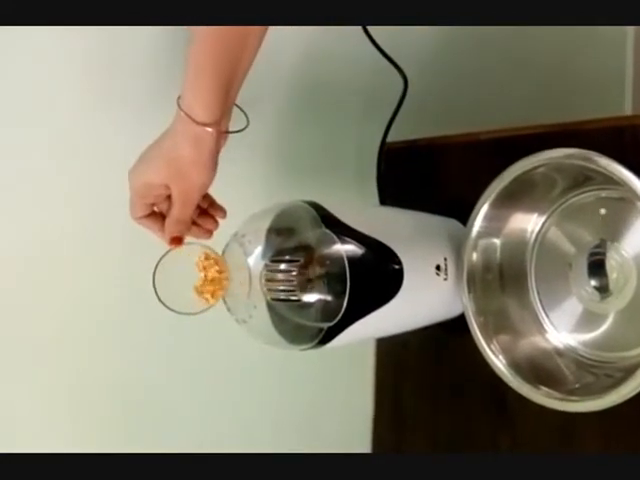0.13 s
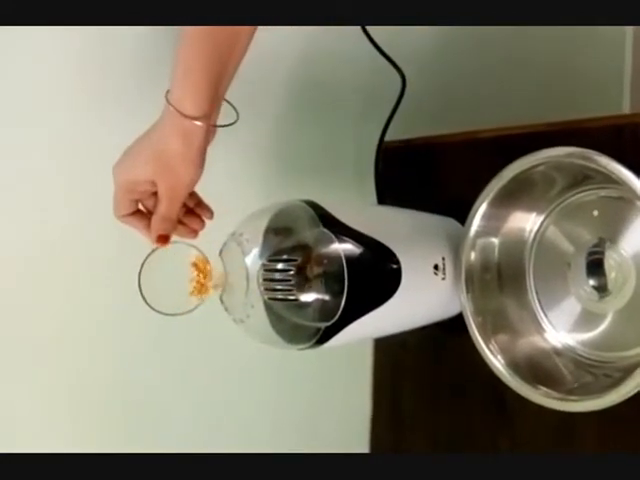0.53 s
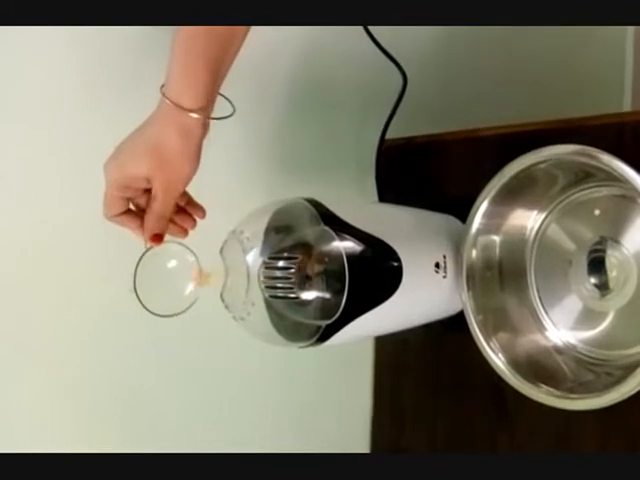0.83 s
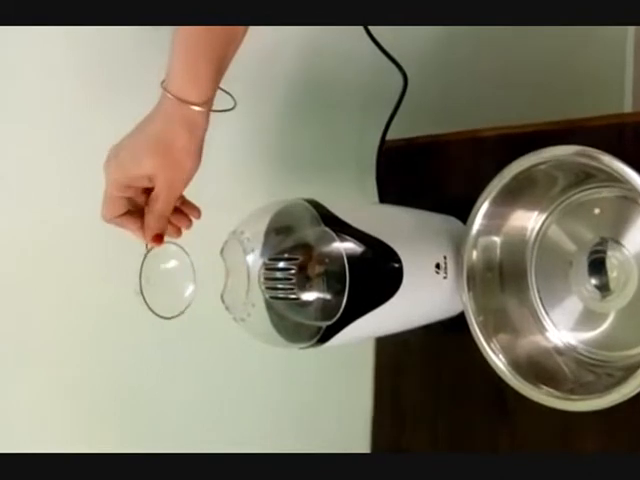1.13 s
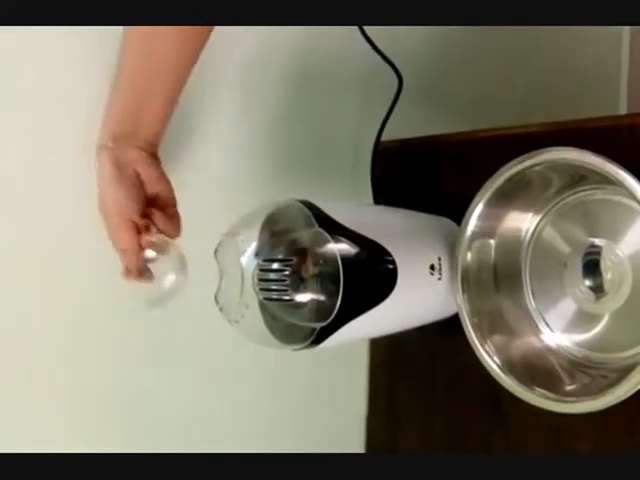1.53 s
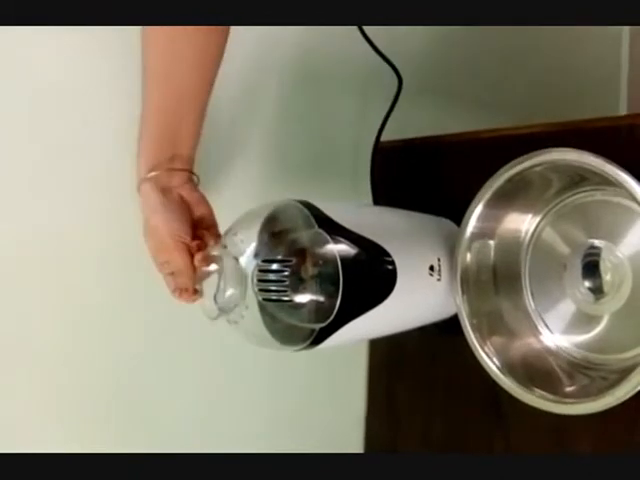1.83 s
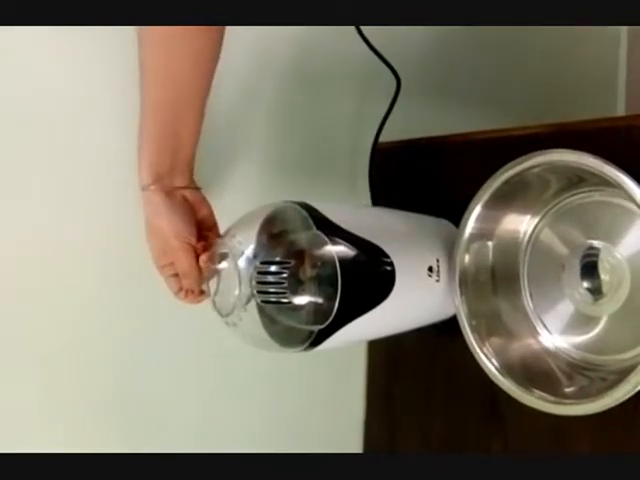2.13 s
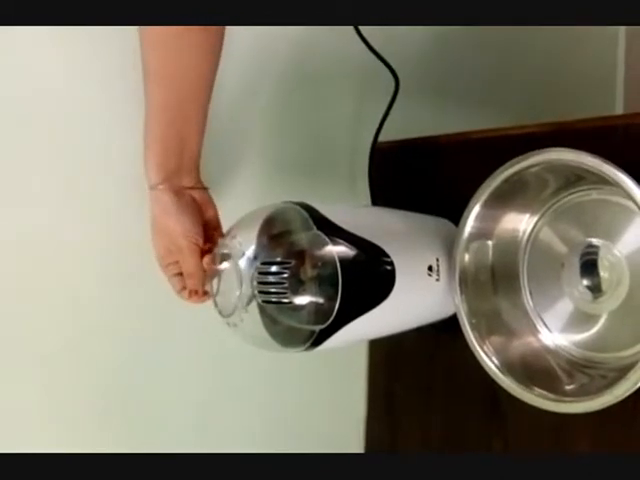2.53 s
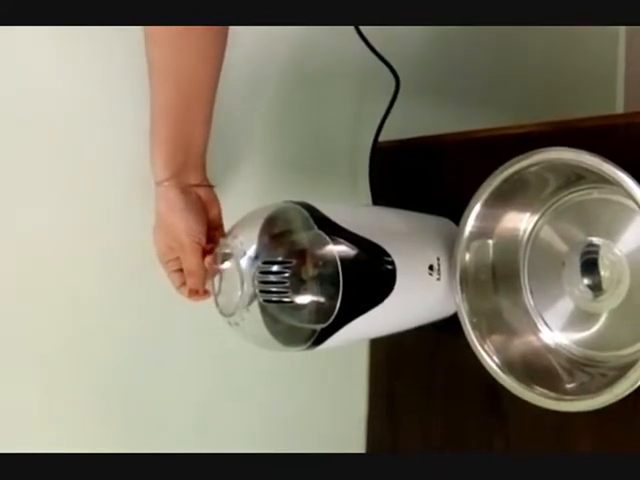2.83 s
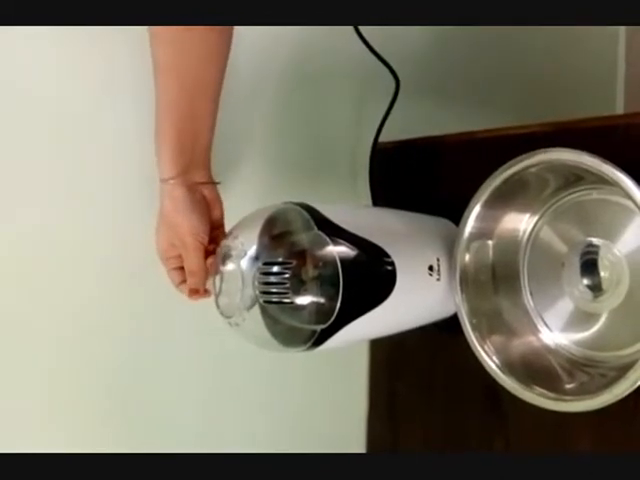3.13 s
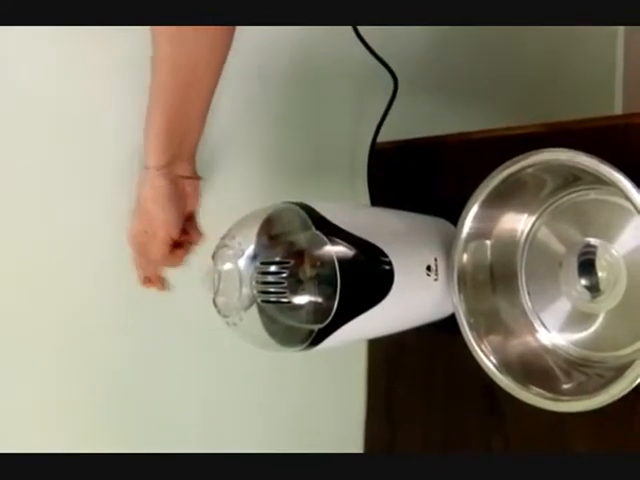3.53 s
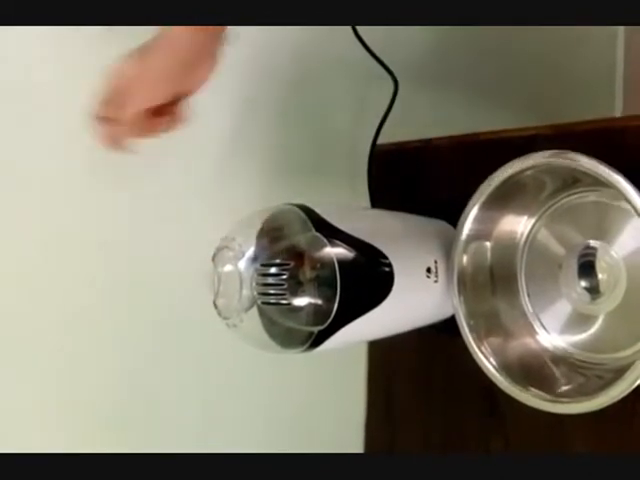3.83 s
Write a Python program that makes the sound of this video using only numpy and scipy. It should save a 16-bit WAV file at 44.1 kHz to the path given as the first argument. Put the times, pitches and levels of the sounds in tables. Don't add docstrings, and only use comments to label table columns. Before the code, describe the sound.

Dry popcorn kernels pour from a cup into a popper, rattling bright and dense against its ringing chamber, thinning to single bounces; then a quieter plastic cup clack and faint knocks, close phone microphone, small hard room.

```python
import sys
import numpy as np
from scipy import signal
from scipy.fft import rfft, irfft
from scipy.io import wavfile
from scipy.ndimage import uniform_filter1d

SR = 44100
rng = np.random.default_rng(int(sys.argv[2]) if len(sys.argv) > 2 else 0)


def rack_gain(trim_db):
    fader = np.asarray(trim_db, float)
    return 10 ** (fader / 20)


def waveform_to_disk(signal):
    frames = np.transpose(np.atleast_2d(signal))
    scaled = np.clip(frames, -1, 1) * 32767
    samples = np.round(scaled).astype(np.int16)
    wavfile.write(sys.argv[1], SR, samples)


N = 176400

# t/s, level/dB, fall/(dB per s)
SURGES = [(0, -18, 24), (.1, -19, 24), (0.237, -23, 204), (0.275, -23.5, 38), (0.304, -20, 28),
          (.45, -23, 18), (.575, -27.5, 89), (0.613, -23.5, 18), (0.643, -27, 197), (0.689, -28, 147.5),
          (0.717, -24, 296.5), (0.753, -24, 27), (.868, -28, 28), (.9, -25, 2), (1.018, -28, 45),
          (1.147, -41, 205.5), (1.2, -47.5, 41), (1.307, -49.5, 63)]
# t/s, peak level/dB, ring f/Hz
LOUD_KERNELS = [(0.0104, -8.5, 5450), (0.0224, -6.5, 5260), (0.045, -7, 6240), (0.0536, -6, 7100),
                (0.0654, -9.5, 5230), (0.0844, -21, 5210), (0.1037, -4.5, 7050), (0.1214, -7.5, 6230),
                (0.1427, -11, 5000), (0.1694, -6.5, 6540), (0.1921, -6, 6000), (0.2093, -9, 5800),
                (0.2374, -11, 3360), (0.2753, -6, 6260), (0.2875, -7, 5200), (0.3018, -5, 6300),
                (0.329, -9.5, 3120), (0.363, -15, 3830), (0.3986, -12, 6610), (0.4512, -11.5, 3730),
                (0.4729, -6.5, 6630), (0.49, -10, 6000), (0.5233, -12.5, 3270), (0.548, -19, 3700),
                (0.5657, -8.5, 6110), (0.612, -8.5, 2350), (0.6295, -5, 4760), (0.6873, -14.5, 6430),
                (0.7209, -9.5, 6260), (0.7592, -13.5, 5800), (0.7716, -7.5, 4750), (0.795, -9.5, 4630),
                (0.83, -15, 6150), (0.8684, -16.5, 3540), (0.8784, -11, 2160), (0.9022, -9, 4730),
                (0.9108, -8, 4800), (0.9415, -14, 4650), (0.9573, -9, 4680), (0.9818, -12.5, 3680),
                (1.0084, -10, 6410), (1.0594, -13.5, 3660), (1.08, -10, 6230), (1.109, -18.5, 3640),
                (1.1482, -17.5, 3300)]
# t/s, peak level/dB
BOUNCES = [(1.2884, -28.5), (1.342, -42), (1.3594, -60), (1.381, -34), (1.4326, -34), (1.4477, -34.5),
           (1.4703, -33.5), (1.4838, -37.5), (1.516, -55.5), (1.53, -43), (1.5437, -39.5)]
# f/Hz, width/Hz, level/dB
CHAMBER = [(781, 14, -7), (1307, 29.3, -10.5), (2492, 56, 0.5), (3165, 38, 1.5), (3390, 13, -2),
           (3685, 30, -1), (4677, 45, -6.5), (5000, 190, -0.5), (5550, 200, 4), (6090, 340, 8),
           (6300, 280, 2), (7580, 170, 7.5), (9000, 190, -19.5), (10570, 70, -10)]
# f/Hz, width/Hz, level/dB
HOUSING = [(275, 35, -9.5), (370, 51, -7.5), (474, 31, -21), (634, 93, -21), (754, 31, -10),
           (837.6, 47, -8.5), (1210, 33, -5), (1462, 34, -7.5), (1908, 40, -5), (2167, 78, 1)]
# f/Hz, level/dB
CRACK = [(100, -32.5), (300, -21.5), (1000, -10.5), (2500, -6.5), (6300, -3), (7800, -11), (9300, -21.5),
         (10800, -17.5)]
# t/s, length/s, f/Hz, width/Hz, level over the stream/dB
PANELS = [(-.1, 0.32, 5260, 249.7, 2.5), (-.1, 0.45, 10720, 506.5, 7.5), (-.1, 0.25, 1226, 90.7, 6),
          (.095, 0.08, 6500, 251, 9), (.15, 0.033, 3325, 150, 9.5), (-.05, .1, 2000, 200, 3),
          (.27, .085, 6400, 300, 7.5), (.305, 0.053, 3230, 90, 11), (.35, 0.025, 5600, 199.7, 9),
          (.42, .15, 3400, 250, 1.5), (.55, 0.13, 730, 50, 10.5), (.6, 0.046, 4650, 201.6, 6.5),
          (.74, 0.061, 3702, 150, 5), (.86, .15, 735, 40.13, 7), (.89, 0.13, 4670, 200, 6),
          (.93, .07, 3720, 80, 4.5), (1.14, .08, 2510, 80, 8), (1.15, .25, 170, 40.1, 13),
          (1.36, .09, 730, 90, 12)]
# t/s, peak level/dB, tilt/(dB per octave), chatter t60/s, thin rim level/dB
KNOCKS = [(1.815, -71, -12, 0.026, -7), (1.831, -43, 2, 0.15, 4), (1.839, -25, -1.5, 0.3, 0.5),
          (1.872, -38, -3.5, 0.13, -1), (1.90, -34, -5, 0.25, 2), (2.006, -32, -2.5, 0.26, 1),
          (2.029, -38, -1, 0.17, 5), (2.10, -45, -4, .12, .6), (2.152, -44, -4, 0.3, 10),
          (2.201, -51, -5, 0.16, 8), (2.254, -50, -6, 0.1, 8), (2.274, -52, -8, .1, 8),
          (2.313, -54, -9, 0.05, .6), (2.414, -58, -3, 0.021, -5), (2.52, -63, -1, .5, -5),
          (2.751, -62, -2, 0.3, -4), (2.994, -53, -4, 0.3, 8), (3.37, -62, -3, 0.15, .6)]
# f/Hz, level/dB, t60/s
CUP = [(274, -5.5, 0.046), (364, -4, 0.043), (478.3, -8, 0.038), (645, -3.5, 0.024), (802, -7, 0.045),
       (878, -4, 0.072), (1278, -0.5, 0.028), (1393, -1.5, 0.033), (112, -12.5, 0.095), (1573, -0.5, 0.025),
       (1742, -5, 0.038), (1960, -5.5, 0.033)]
# f/Hz, level/dB, t60/s
LID = [(2200, -7, .015), (2400, -10, .015), (2560, -10, .02), (2780, -10, .02), (2900, -13, .025),
       (3070, -13, .03), (3270, -12, .03), (3500, -13, .015), (3700, -15, .012), (4070, -17, .02),
       (4600, -23, .008), (5500, -28, .008), (7100, -32, .006)]
# t/s, f/Hz, peak level/dB, t60/s
ROCKS = [(1.84, 645, -38, .12), (1.873, 860, -40, .1), (2.005, 366, -36, .16), (2.11, 880, -49, .3),
         (2.151, 478, -39, .2), (2.08, 150, -48, .8), (2.152, 3270, -55, .12), (2.155, 1750, -56, .15),
         (2.25, 1340, -58, .4), (2.254, 395, -42, .09), (2.27, 400, -43, .08), (2.292, 441, -47, .15),
         (2.313, 420, -47, .05), (1.885, 110, -46, .25), (3.0, 440, -56, .15)]
# t/s, length/s, f/Hz, level/dB
SQUEAKS = [(1.865, .07, 6250, -66), (2.03, .06, 5500, -74), (2.45, .08, 4400, -76), (2.505, .06, 5050, -73),
           (2.545, .065, 4370, -67), (2.62, .04, 4420, -76), (2.695, .065, 3920, -68),
           (2.985, .065, 2320, -64), (3.02, .085, 800, -62), (2.99, .095, 3320, -72), (2.77, .2, 315, -63)]
# f/Hz, t60/s
ROOM = [(150, 1), (500, 0.89), (1500, 0.9), (3500, 0.6), (8000, 0.1), (11000, 0.049)]
# f/Hz, level/(dB per Hz)
HUSH = [(30, -13), (116, -2), (280, -6.5), (500, -12.5), (1000, -18), (6300, -25.5), (7800, -35),
        (12600, -37)]

CUT_S = 1.635
RISE_S = 0.00024
LEAD = 64
TICK_LEN = 4096


def level(x, db):
    return x * rack_gain(db) / np.sqrt(np.mean(x ** 2))


def colour(x, table):
    hz, db = np.array(table).T
    f = np.arange(len(x) // 2 + 1) * SR / len(x) + 1
    gain = rack_gain(np.interp(np.log(f), np.log(hz), db))
    return irfft(rfft(x) * gain, len(x))


def butter(x, order, hz, kind="low"):
    return signal.sosfilt(signal.butter(order, hz, kind, fs=SR, output="sos"), x)


def burst(t60, size):
    return rng.standard_normal(size) * rack_gain(-60 * np.arange(size) / SR / t60)


def rings(hz, db, t60, size=8192):
    t = np.arange(size) / SR
    hz, db, t60 = (np.reshape(v, (-1, 1)) for v in (hz, db, t60))
    return (rack_gain(db - 60 * t / t60) * np.sin(2 * np.pi * hz * t)).sum(axis=0)


def place(out, s, sound, db):
    start = int(s * SR)
    return out + np.pad(sound * rack_gain(db) / np.abs(sound).max(), (start, N))[:N]


def walk(rate):
    k = int(SR / rate)
    steps = np.repeat(rng.standard_normal(N // k + 1), k)
    return 1.3 * uniform_filter1d(uniform_filter1d(steps, k), k)[:N]


def pour():
    t = np.arange(N) / SR
    flow = stream()
    third = N // 3
    flow = flow + np.pad(panels(flow[:third]), (0, N - third))
    boom = butter(flow, 2, 930)
    flow = flow + boom * (rack_gain(7.5 * np.minimum(t, 1.3)) - 1)
    surges = np.array(SURGES)
    start, db, fall = surges[np.searchsorted(surges[1:, 0], t)].T
    loudness = uniform_filter1d(rack_gain(db - fall * (t - start)), size=64)
    out = level(flow, -1.95) * loudness * (t < CUT_S)
    for s, db, hz in LOUD_KERNELS:
        out = place(out, s - LEAD / SR, loud_kernel(hz), db - 3.5)
    for s, db in BOUNCES:
        out = place(out, s - LEAD / SR, tick(), db - 2.5)
    return out


def stream():
    hits_per_s, scatter_db, spots = 1100, 0.5, 32
    out = np.zeros(N)
    for _ in range(spots):
        hit = rng.random(N) < hits_per_s / spots / SR
        strength = rack_gain(scatter_db * np.minimum(rng.exponential(size=N), 3))
        out = out + signal.fftconvolve(hit * strength, tick())[:N]
    return np.roll(out, -TICK_LEN)


def loud_kernel(hz):
    delay = int(.004 * SR * (.5 + rng.random()))
    own_ring = level(rings(hz, 0, .014, size=TICK_LEN), -33.5)
    return tick() + rack_gain(0.5) * np.roll(tick(), delay) + np.roll(own_ring, LEAD)


def tick():
    spot_db, stiff_hz = 10, 3000
    hz, width, db = np.array(CHAMBER + HOUSING).T
    rise = 1 - np.exp(-np.arange(TICK_LEN) / SR / RISE_S)
    free = np.clip(hz / stiff_hz, .3, 1)
    spot_hz = hz * (1 + .025 * free * rng.standard_normal(len(hz)))
    spot_level = db + spot_db * free * rng.standard_normal(len(hz))
    ring = rings(spot_hz, spot_level, 2.4 / np.maximum(width, 40), size=TICK_LEN)
    crack = colour(np.roll(burst(.011, TICK_LEN) * rise, LEAD), CRACK)
    return level(crack, -36) + np.roll(level(ring * rise, -39.5), LEAD)


def panels(flow):
    t = np.arange(len(flow)) / SR
    out = np.zeros(len(flow))
    for s, length, hz, width, db in PANELS:
        swell = np.sin(np.pi * np.clip((t - s) / length, 0, 1)) ** .5
        b, a = signal.iirpeak(hz, hz / width, fs=SR)
        out = out + rack_gain(db) * swell * signal.lfilter(b, a, flow)
    return out


def cup():
    hz, db, t60 = np.tile(np.array(CUP + LID).T, 2)
    detune, spot_db, rim_hz = 0.013, 4, 2200
    out = np.zeros(N)
    for s, peak_db, tilt_db, chatter_s, rim_db in KNOCKS:
        shift, spot, side = rng.standard_normal((3, len(hz)))
        tilt = tilt_db * np.log2(np.maximum(hz, 400) / 500)
        mode_db = db + tilt + rim_db * (hz > rim_hz) + spot_db * spot
        body = rings(hz * (1 + detune * shift) * np.sign(side), mode_db, t60, size=4096)
        push = burst(chatter_s, 16384) * rng.random(16384) ** 2 * rack_gain(2.5)
        push[:24] += np.hanning(24)
        out = place(out, s, signal.fftconvolve(push, body), peak_db + 0.2)
    for s, ring_hz, peak_db, ring_s in ROCKS:
        rock = signal.fftconvolve(rings(ring_hz, 0, ring_s), np.hanning(48))
        out = place(out, s, rock, peak_db)
    return butter(out, 6, 7500)


def squeaks():
    t, out = np.arange(N) / SR, np.zeros(N)
    for s, length, hz, db in SQUEAKS:
        u = np.clip((t - s) / length, 0, 1)
        loudness = rack_gain(db + 1.5 * walk(60)) * np.sin(np.pi * u) ** .5
        pitch = hz * (1 - .012 * u) + 36 * walk(130) * min(hz / 2000, 1)
        out = out + loudness * np.sin(2 * np.pi * np.cumsum(pitch) / SR)
    return out


def room(x):
    tail = np.zeros(32768)
    for hz, t60 in ROOM:
        tail = tail + butter(burst(t60, 32768), 2, [hz / 1.615, hz * 1.77], "band")
    tail = np.pad(level(tail, -52.5), (int(.004 * SR), 0))
    before = x[8191::-1]
    return signal.fftconvolve(np.r_[before, x], tail)[len(before):len(before) + N]


def hush():
    x = level(colour(rng.standard_normal(N), HUSH), -61)
    low = signal.sosfiltfilt(signal.butter(2, 600, fs=SR, output="sos"), x)
    deep = signal.sosfiltfilt(signal.butter(2, 55, fs=SR, output="sos"), x)
    duck = np.where(np.arange(N) < CUT_S * SR, rack_gain(-9 + 11 * walk(1.3)), 1)
    return x - low + (low - deep + deep * duck) * rack_gain(1.6 * walk(30))


def shred_treble(x):
    pour_top_hz, creep_hz_s, tail_top_hz = 11700, 420, 7200
    shred_width_hz, shreds_per_s, shred_db = 200, 14, -12
    hz, t, z = signal.stft(x, SR, nperseg=1024)
    row, column = (hz / shred_width_hz).astype(int), (t * shreds_per_s).astype(int)
    luck = rng.random((200, 200))[row][:, column]
    starve = np.clip((t - 1.18) / .3, .03, .84)
    hz = hz[:, None]
    keep = (hz < pour_top_hz + creep_hz_s * t) & ((hz < tail_top_hz) | (luck > starve))
    gain = np.where(hz < tail_top_hz, 1, rack_gain(shred_db * starve))
    return signal.istft(z * keep * gain, SR, nperseg=1024)[1][:N]


def scene():
    mic_low_hz, chute_low_hz = 93, 123
    kernels = butter(butter(pour(), 2, chute_low_hz, "high"), 3, mic_low_hz, "high")
    knocks = butter(cup(), 3, mic_low_hz, "high")
    echoes = room(kernels + rack_gain(-3) * knocks)
    return (kernels + knocks + echoes + squeaks() + hush())[None]


def top_cut(x):
    return signal.sosfilt(signal.butter(12, 12830, fs=SR, output="sos"), x)


def record(dry):
    t = np.arange(N) / SR
    dip = np.where(t < CUT_S + .0195, rack_gain(-20), 1)
    mix = np.where(t < CUT_S, shred_treble(dry[0]), dry * dip)
    return top_cut(mix)


dry = scene()
out = record(dry)
waveform_to_disk(out)
```